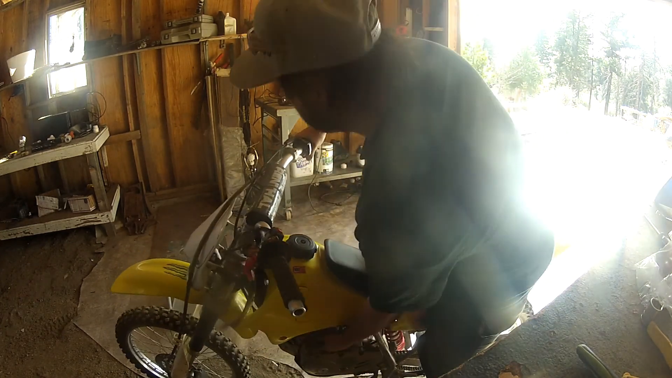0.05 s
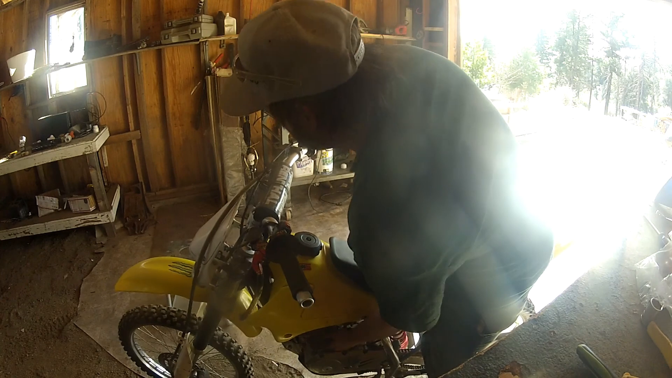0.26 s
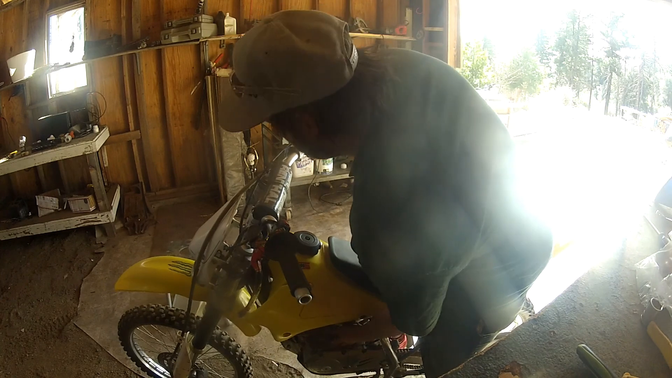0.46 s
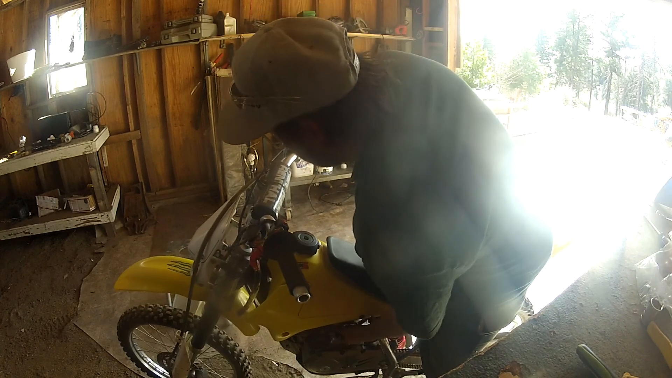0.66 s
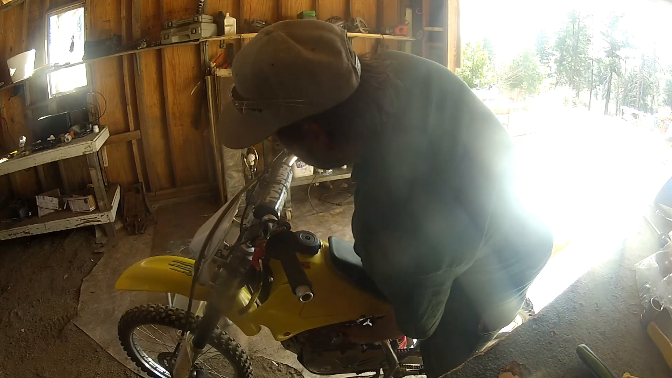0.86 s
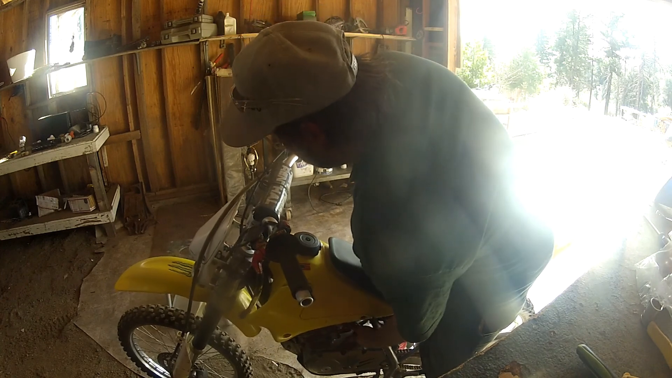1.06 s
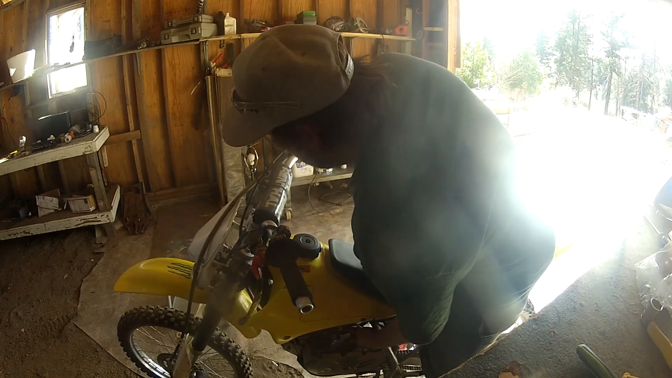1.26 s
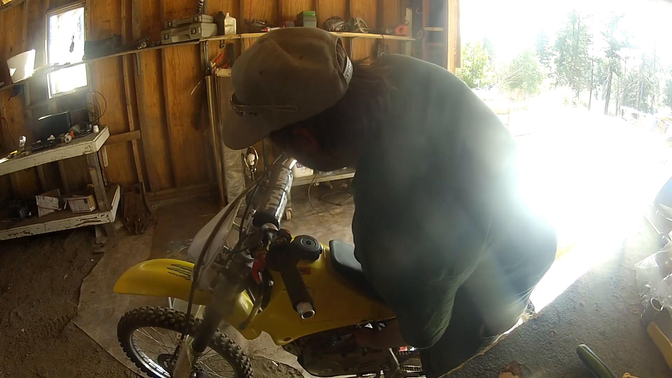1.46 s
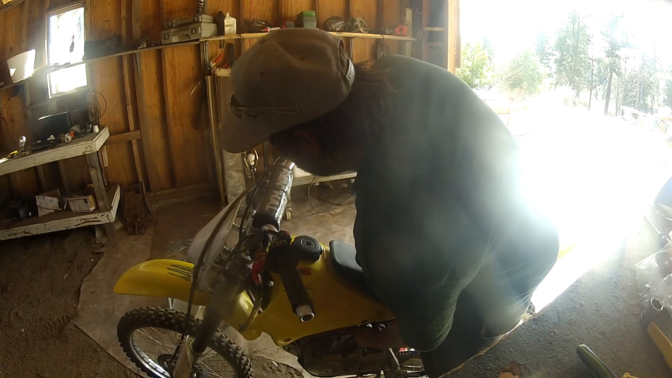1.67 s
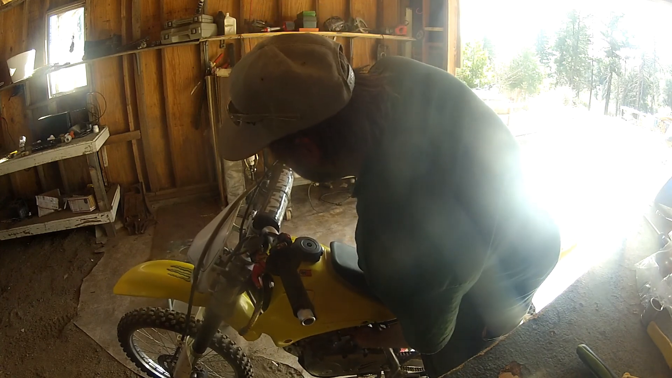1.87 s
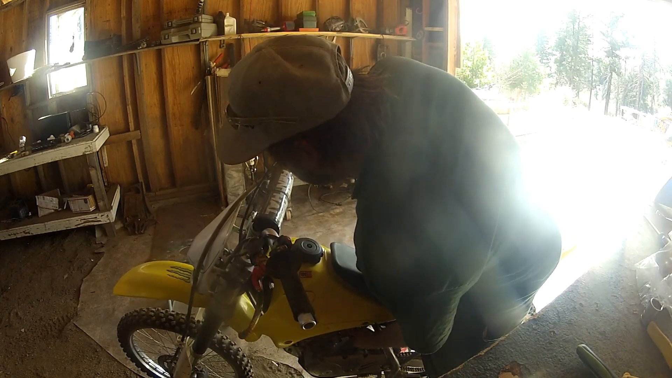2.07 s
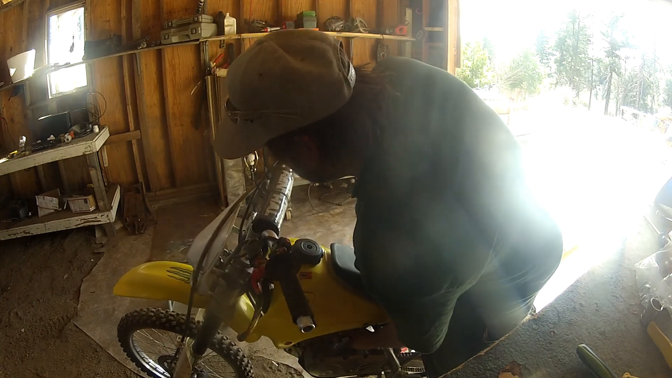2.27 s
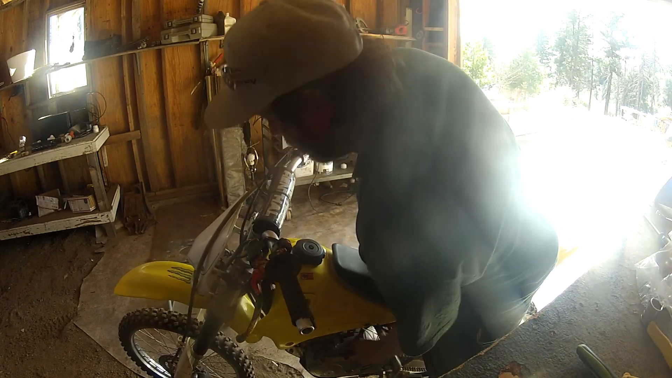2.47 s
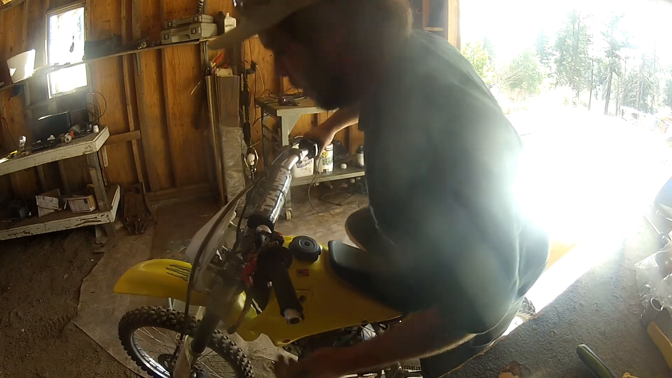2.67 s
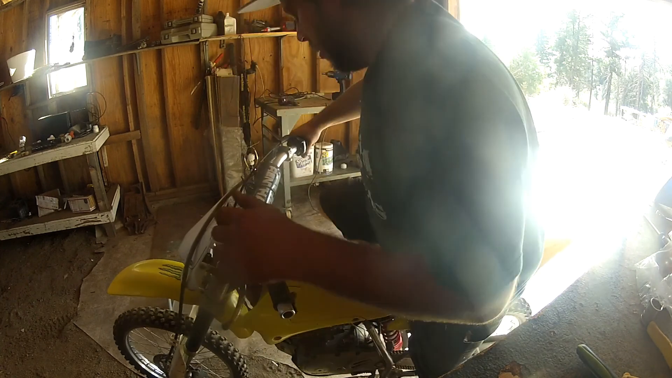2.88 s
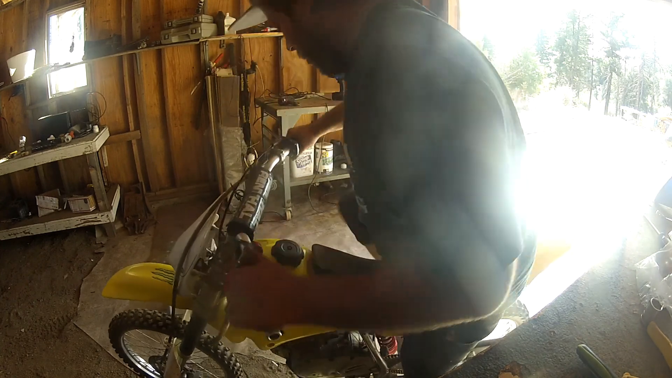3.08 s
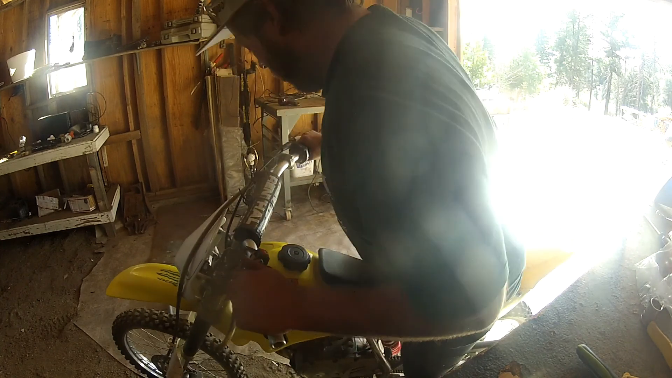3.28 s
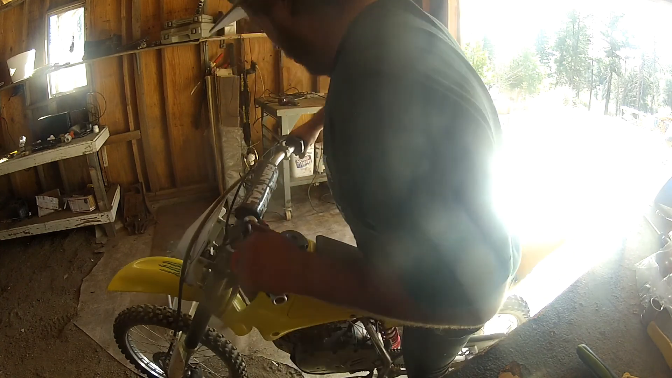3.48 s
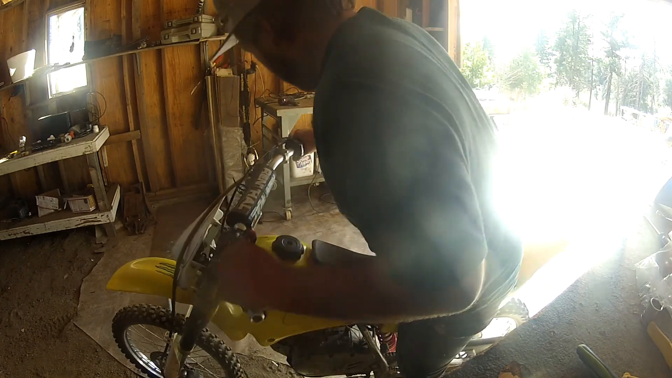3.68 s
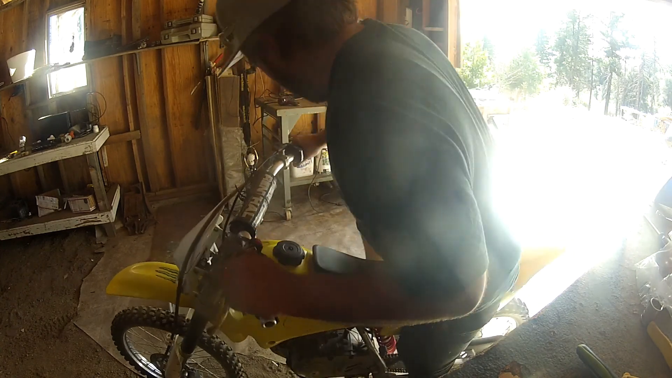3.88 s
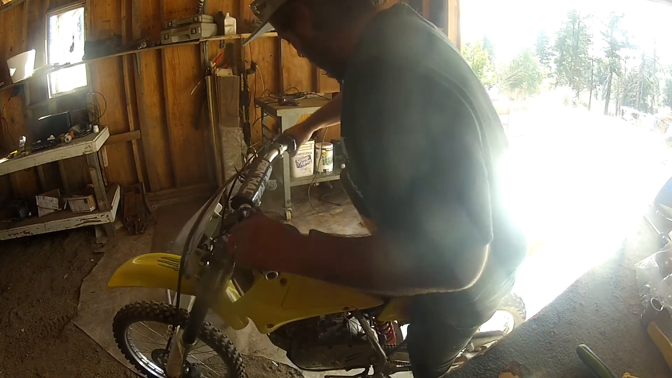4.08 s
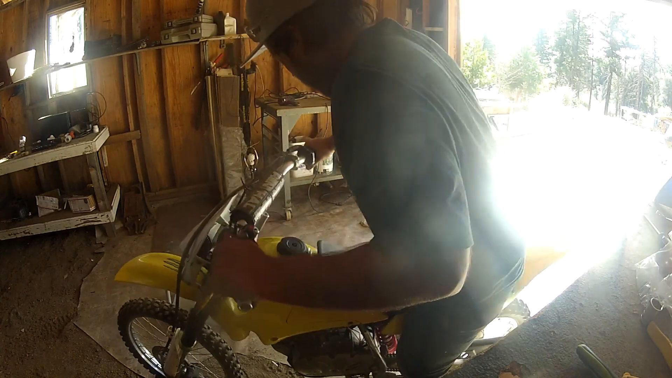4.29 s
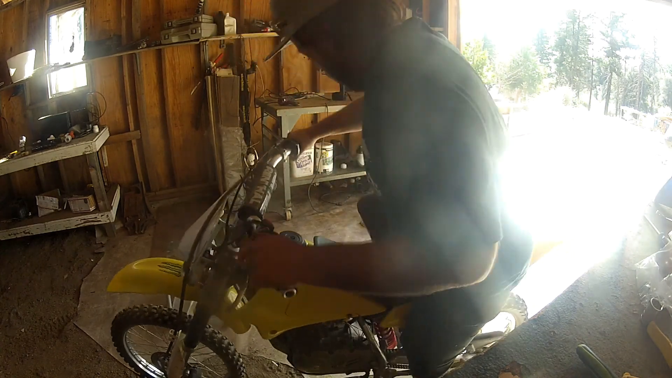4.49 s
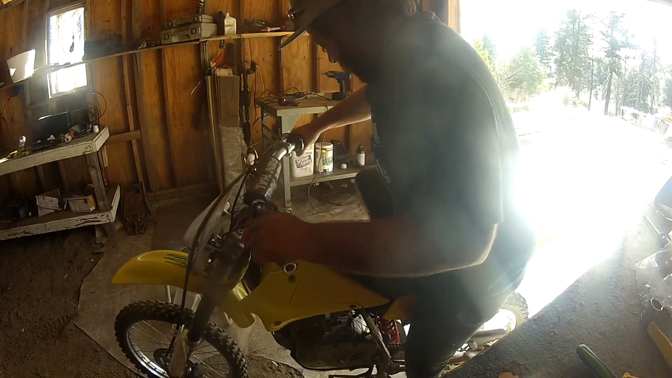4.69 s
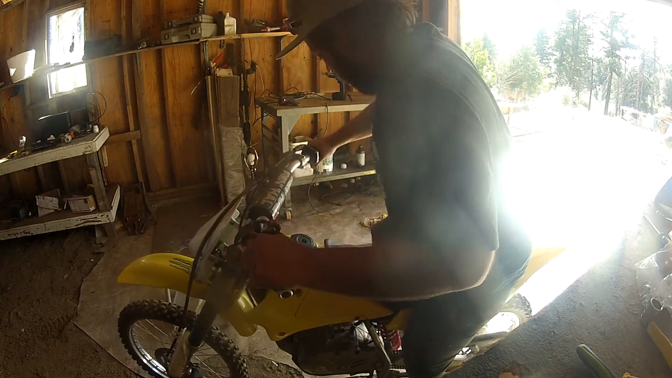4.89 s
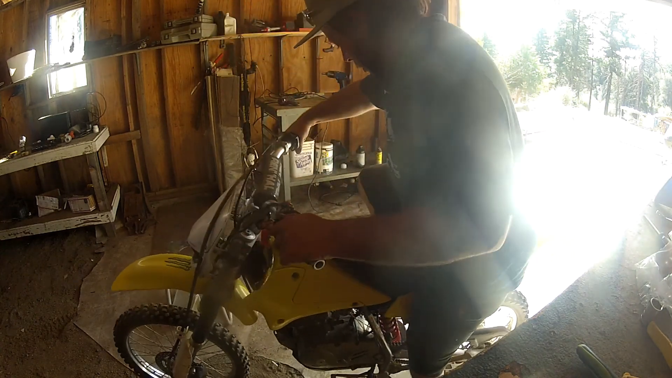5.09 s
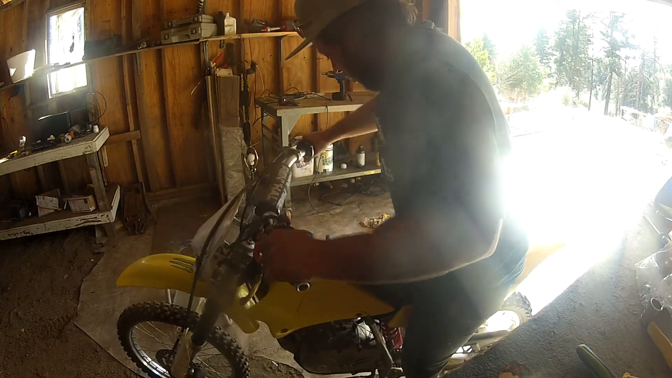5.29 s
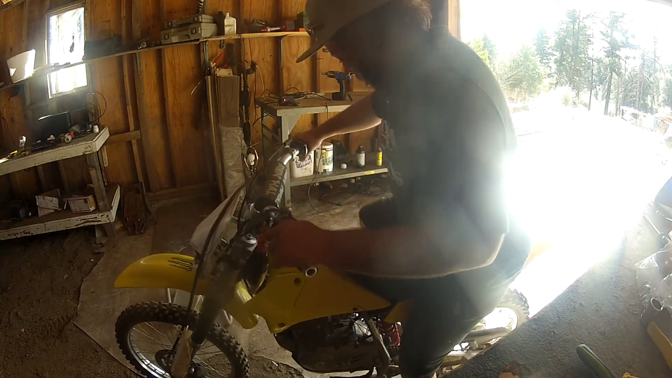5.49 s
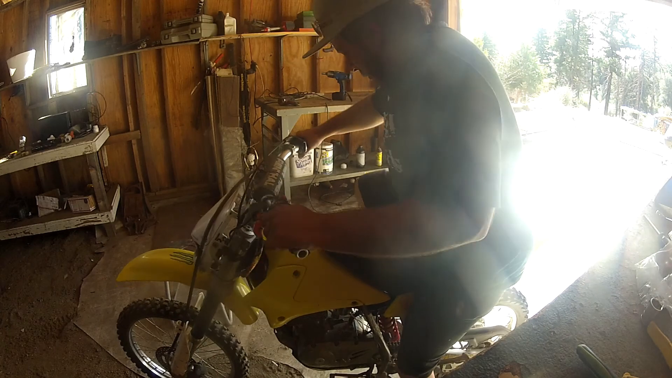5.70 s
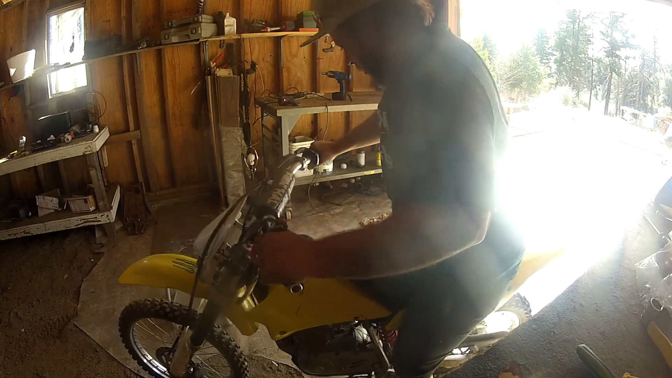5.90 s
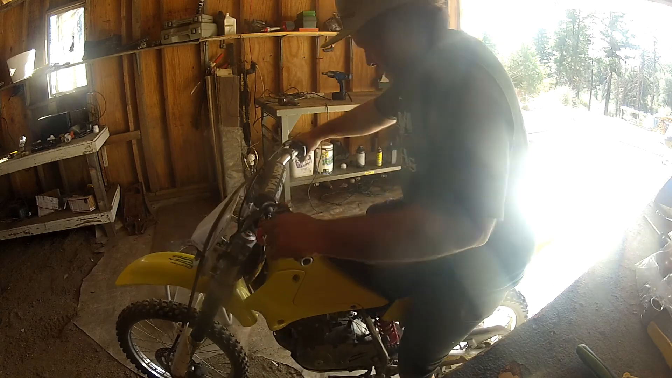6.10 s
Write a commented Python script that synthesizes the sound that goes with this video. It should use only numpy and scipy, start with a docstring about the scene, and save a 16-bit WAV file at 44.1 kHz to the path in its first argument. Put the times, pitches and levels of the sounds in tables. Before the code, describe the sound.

Nearly silent at first, only cloth movement, faint scrapes and steady air. Midway a small motorbike's lever creaks and clicks, then come six quick kickstart strokes, each a clack, a ringing metal clank, a brief churning rattle of the engine and low puffs from the pipe, with boot scuffs between. No firing. Near microphone with coarse treble, short garage reflections.

```python
"""A kick lever on a small single-cylinder motorbike is trodden six times in a wooden garage; it never fires.
Slams, lever and ratchet clicks ring metal modes; engine parts are random contacts in resonances.
The exhaust puffs as low sines; knocks, scuffs and squeaks are shaped noise; eight feedback delays echo.
Cloth rustle and outdoor air are coloured noise under it all.
Sample-and-hold at 12 kHz mirrors the sound into the treble."""
import sys
import numpy as np
from scipy import signal
from scipy.fft import rfft, irfft, next_fast_len
from scipy.io import wavfile

SR = 44100
rng = np.random.default_rng(int(sys.argv[2]) if len(sys.argv) > 2 else 0)


def persist_wave(psi):
    """Save psi, clipped to +-1, as 16-bit WAV."""
    counts = np.round(np.clip(psi, -1, 1) * 32767).astype(np.int16)
    wavfile.write(sys.argv[1], SR, np.atleast_2d(counts).T)


N = 271134

# lever slams on its stop: start_s
SLAM_START_S = [3.262, 3.83, 4.349, 4.903, 5.41, 5.921]
# six kicks: slam_db, slam_brightness_db, rebound_delay_s, rebound_db, jolt_share,
# spin_s, vigour_db, cover_buzz_db, lever_back_s (after the slam), swing_db
KICKS = [(-9, -22, 0.036, -23.5, 0.37, .205, -1.5, 0, .42, 1.5),
         (-8, -4.5, 0.018, -21.5, 1.34, 0.2, 0.74, -0.6, 0.32, -0.5),
         (-5.5, -9.5, 0.036, -23.5, 1.45, 0.21, 0.5, 1, 0.43, -3.2),
         (-16, -3, .032, -22, 1.24, 0.27, -1.2, -0.2, 0.17, 5),
         (-14.5, -2.5, .027, -21, 1.38, 0.2, -0.53, 0.8, 0.14, -6),
         (-12, -8, .037, -23, 1.1, 0.2, 0.4, 0.8, .4, 5.5)]
# boot lands on the lever and pushes: start_s, landing_db, landing_brightness_db, push_db
BOOT = [(3.139, -51, 2, -4.5), (3.712, -35, -13, 0), (4.245, -44, -12, 1.5), (4.807, -39, -10.5, 1),
        (5.325, -53, 1, 1), (5.754, -40, -17, -5)]
# lever and ratchet clicks: start_s, level_db, brightness_db
CLICKS = [(2.927, -28.5, 13), (3.241, -15, 0.5), (3.519, -19, -14), (3.784, -21, 7), (3.795, -17.5, 4),
          (4.308, -12.5, 5.5), (4.859, -12, -4), (5.878, -12, 7)]
# engine part levels through a kick: landing_db, push_rise_db_per_s, spin_db, jolt_db,
# spin_sag_db_per_s, stop_fall_db_per_s, swing_back_db, linger_s
RATTLE = (-54.5, 78, -32.5, 3, 11.5, 205, -60, 0.0036)
BUZZ = (-71, 90, -38, -2, -17.5, 215, -87, -0.0016)
RUMBLE = (-48, 117, -30.5, 4.5, 21, 134, -48, 0.03)
BOOM = (-47.5, 146, -36, 13, 17.5, 98, -48, 0.03)
# lever folded out and eased against compression: time_s, drag_db
SETTING_UP = [(2.45, -78), (2.57, -71), (2.71, -63), (2.775, -63), (2.79, -47), (2.85, -59.5), (2.88, -48),
              (3.04, -55), (3.12, -60), (3.2, -61)]
# drag shares: rattle_db, buzz_db, rumble_db, boom_db
DRAG_SHARES = (-3.5, -11, 1, -8)
# exhaust valve opens, twice a kick: start_s, level_db
VALVE = [(3.211, -24.5), (3.336, -26.5), (3.815, -25.5), (3.932, -27.5), (4.329, -25), (4.446, -23),
         (4.885, -24.5), (5.019, -24.5), (5.367, -23.5), (5.488, -26), (5.905, -26.5), (6.022, -27)]
# boot and lever knock and scuff on the engine: start_s, level_db, brightness_db
KNOCKS = [(1.632, -52, -8.5), (2.784, -45, -6), (2.803, -50, 4.5), (2.864, -46.5, 0.5), (2.883, -51, 6),
          (2.945, -45, 3), (3.02, -53, -0.5), (3.428, -33, -8), (3.53, -31, -23), (3.586, -39, -28),
          (3.629, -52, -24), (3.696, -44, -12), (3.868, -41, -8), (4.09, -37, -17), (4.257, -39, -22),
          (4.697, -37, -16), (5.046, -35, -2), (5.059, -32.5, -1), (5.19, -41, -19), (5.7, -63, -20),
          (5.819, -52, -3), (6.037, -31, -10)]
# narrow scrapes and squeaks: start_s, length_s, pitch_hz, width_hz (per pass), level_db
SQUEAKS = [(0.3, 0.045, 2340, 250, -72), (0.612, 0.085, 3910, 200, -67.5), (0.623, 0.045, 4900, 600, -70),
           (1.057, 0.12, 5000, 900, -77), (2.132, 0.026, 3000, 130, -57), (2.177, 0.027, 2900, 130, -63.5),
           (2.382, 0.015, 3450, 700, -67), (2.56, 0.1, 2830, 300, -74), (2.654, 0.11, 575, 200, -57.5),
           (2.776, 0.083, 566, 151, -45), (2.86, 0.18, 550, 150, -50), (3.023, 0.033, 3040, 500, -54.5),
           (4.704, 0.076, 2830, 500, -59.5), (5.312, 0.16, 4550, 150, -57.5)]
# clothes and boots move: start_s, length_s, dull_db, scratchy_db
RUSTLE = [(-.03, 0.088, -58, -78), (.47, 0.15, -69, -70.5), (0.61, 0.073, -67, -64.5),
          (0.822, 0.016, -66, -71), (0.93, 0.21, -87, -72.5), (1.64, 0.052, -69, -85),
          (2.133, 0.067, -54.5, -75), (2.51, 0.21, -67, -71)]
# rustle between movements: dull_db, scratchy_db
RUSTLE_REST = (-69.5, -79.5)
# modes of lever stop, lever and exhaust pipe: pitch_hz, level_db, t60_s
STOP_MODES = [(109.5, -6.5, 0.3), (246, -5, 0.18), (487, -3.5, 0.034), (690, -12, 0.012), (802, -2.5, 0.11),
              (940, -11.5, 0.041), (1110, -15, 0.047), (2406, 0.5, 0.11), (2470, -37, 0.049),
              (2600, -27, 0.078), (4920, -1, 0.17), (5080, -8.5, 0.12)]
LEVER_MODES = [(304, -18, 0.046), (612, 2, 0.076), (670, -36, 0.051), (937, -13, 0.074), (2850, -23, 0.04),
               (4633, -20.5, 0.038)]
PIPE_MODES = [(62.7, 7.5, 0.24), (116.3, -0.5, 0.49)]
# resonances of gears, side cover, crankcase and frame: pitch_hz, width_hz, level_db
GEARS = [(1330, 1540, -13), (2490, 314, -3.5), (2890, 210, 0.5), (3177, 840, -6), (4110, 450, -8),
         (4583, 195, -4.5), (5175, 670, -12.5)]
COVER = [(1943, 305, -9.5), (2140, 194, -6.5)]
CASE = [(426, 77, -5.5), (551, 46.6, 0.5), (615, 93, -1), (735.5, 116, -4.5), (877, 106, -12.5)]
FRAME = [(75, 38, -3), (128, 61, -6.5), (211.4, 30.6, -4.5), (258.8, 22, -1), (296, 43.7, -0.5)]
# spectra of dull rustle, scratchy rustle and outdoor air: frequency_hz, relative_db_per_hz
CLOTH = [(100, 1.5), (300, 2.5), (700, -0.5), (1200, -15.5), (2000, -25.5)]
SCRATCH = [(1000, -6), (2000, -1.5), (3000, 4.5), (4500, -2.5), (5900, -7)]
AIR = [(15, -40), (25, -3), (118, -4), (207, -7), (284, -5), (380, -14), (609, -18), (798, -21),
       (1070, -24), (1710, -24.5), (1960, -25.5), (5400, -30.5), (7020, -70), (11900, -120)]

LEAN_S, JOLT_DECAY_S, SETTLE_DECAY_S = 0.02, 0.052, 0.049
SCUFF_DECAY_S, BOOT_SCUFF_DECAY_S, CRASH_DECAY_S = 0.012, 0.019, 0.038
COVER_OFFSET_DB = 1
ECHO_PUFF_S, ECHO_PUFF_DB = 0.052, -38.5   # weak third puff after the second
GARAGE_T60_S, WALL_CUT_HZ, GARAGE_DB = 0.22, 8300, -11
RUSTLE_RISE_S, RUSTLE_DECAY_S = 0.016, 0.041
AIR_DB = -59.5
LOW_CUT_HZ, ALIAS_CUT_HZ, HOLD_HZ, TOP_CUT_HZ = 34.8, 5740, 12000, 15300


def lever_slams():
    """The lever hits its stop: a contact and short chatter ring the stop modes."""
    slam_db, bright_db = np.transpose(KICKS)[:2]
    events = np.transpose([SLAM_START_S, slam_db, bright_db])
    return blows(events, STOP_MODES, level_db=-11.5, scatter_db=1.0, chatter_s=0.0056)


def lever_and_ratchet_clicks():
    """Lever and ratchet clicks ring the lever modes."""
    return blows(CLICKS, LEVER_MODES, level_db=-7.5, scatter_db=1.0, chatter_s=0.0075)


def blows(events, modes, level_db, scatter_db, chatter_s):
    """Each contact with chatter strikes every mode anew; brightness lifts modes above 1.5 kHz."""
    start_s, db, bright_db = np.transpose(events)
    at, out = np.round(start_s * SR).astype(int), np.zeros(N)
    luck = rng.standard_normal((len(at), len(modes)))
    fade = np.exp(-np.arange(2000) / (chatter_s * SR))
    fade = rms_one(fade) / 45   # about unit energy
    for k, (hz, mode_db, t60_s) in enumerate(modes):
        strike_db = db + level_db + mode_db + scatter_db * luck[:, k]
        clicks = np.zeros(N)
        clicks[at] = from_db(strike_db + bright_db * (hz > 1500))
        chatter = signal.fftconvolve(clicks, fade)[:N] * rng.standard_normal(N)
        out += ring(0.24 * clicks + chatter, hz, t60_s)
    return out


def engine():
    """Loose gear teeth rattle and buzz the side cover; heavier contacts shake crankcase and frame."""
    drag_db, = in_time(SETTING_UP)
    rattle = rms_one(resonances(clatter(3500, spread_db=1.0), GEARS))
    buzz = rms_one(resonances(clatter(900, spread_db=1.5), COVER))
    rumble = rms_one(resonances(clatter(500, spread_db=1.0), CASE))
    boom = rms_one(resonances(clatter(300, spread_db=1.0), FRAME))
    out = np.zeros(N)
    parts = zip((rattle, buzz, rumble, boom), (RATTLE, BUZZ, RUMBLE, BOOM), DRAG_SHARES)
    for part, rule, share_db in parts:
        gain = follow(rule, cover=rule is BUZZ) + from_db(drag_db + share_db)
        out += gain * part
    return out


def follow(rule, cover=False):
    """Gain of one engine part over all kicks: push, jolt and free spin, run-down, lever swinging back."""
    land_db, rise, spin_db, jolt_db, sag, fall, back_db, linger_s = rule
    t, power = np.arange(N) / SR, 0
    for boot, slam_s, kick in zip(BOOT, SLAM_START_S, KICKS):
        land_s, *_, push_db = boot
        *_, jolt, spin_s, vigour_db, cover_db, back_s, swing_db = kick
        after = t - slam_s
        lean = np.clip((t - land_s) / LEAN_S, 0, 1) * (after < 0)
        push = lean * from_db(land_db + push_db + rise * np.minimum(t - land_s, 1))
        held = np.clip(after, 0, spin_s + linger_s)
        level_db = spin_db + (cover_db if cover else vigour_db)
        level_db = level_db + jolt * jolt_db * np.exp(-held / JOLT_DECAY_S)
        level_db = level_db - sag * held - fall * np.maximum(after - held, 0)
        spin = (after >= 0) * from_db(level_db)
        settle = np.exp(-np.maximum(after - back_s, 0) / SETTLE_DECAY_S)
        back = (after >= 0) * settle * from_db(back_db + swing_db)
        power = power + push ** 2 + spin ** 2 + back ** 2
    return np.sqrt(power)


def exhaust():
    """Pipe modes build while the valve is open, drop when it shuts and hum on faintly."""
    t, out = np.arange(SR // 2) / SR, np.zeros(N + SR)
    open_s, shut_decay_s, hum = 0.031, 0.008, from_db(-11)
    after = np.maximum(t - open_s, 0)
    build = np.interp(t, [0, 0.003, open_s], [0, 0.4, 1])
    puff = 0
    for k, (hz, db, t60_s) in enumerate(PIPE_MODES):
        drop = (1 - hum) * np.exp(-after / shut_decay_s)
        fade = drop + hum * from_db(-60 * after / t60_s)
        puff = puff - (-1) ** k * from_db(db) * build * fade * np.sin(2 * np.pi * hz * t)
    echoes = [(s + ECHO_PUFF_S, ECHO_PUFF_DB) for s, _ in VALVE[1::2]]
    for s, db in list(VALVE) + echoes:
        i = round(s * SR)
        out[i:i + len(t)] += from_db(db) * puff
    return out[:N]


def slam_crashes():
    """Each slam also shakes the engine bodies with decaying friction."""
    slam_db, bright_db = np.transpose(KICKS)[:2]
    slams = zip(SLAM_START_S, slam_db, bright_db)
    return knocks([(s, db - 23, b + 8, -11, CRASH_DECAY_S) for s, db, b in slams])


def boot_and_lever_knocks():
    """Boot landings, lever rebounds and stray contacts scuff the engine bodies."""
    delay_s, rebound_db = np.transpose(KICKS)[2:4]
    boots = [(s, db, b, b - 11, BOOT_SCUFF_DECAY_S) for s, db, b, _ in BOOT]
    rebound_s = np.array(SLAM_START_S) + delay_s
    rebounds = [(s, db, -8, -13, SCUFF_DECAY_S) for s, db in zip(rebound_s, rebound_db)]
    others = [(s, db, b, b + COVER_OFFSET_DB, SCUFF_DECAY_S) for s, db, b in KNOCKS]
    return knocks(boots + rebounds + others)


def knocks(events):
    """Decaying friction bursts shake crankcase and frame, gears and cover."""
    t, shake = np.arange(N) / SR, np.zeros((3, N))
    for s, db, gears_db, cover_db, decay_s in events:
        fade = (t >= s) * np.exp(-np.maximum(t - s, 0) / decay_s)
        shake += from_db(db + np.array([[0], [gears_db], [cover_db]])) * fade
    white = rng.standard_normal((3, N))
    white[0, [int(s * SR) + 2 for s, *_ in events]] += 18   # first contact thumps the case
    peaks = (CASE + FRAME[2:], GEARS, COVER)
    bodies = [rms_one(resonances(noise, body)) for noise, body in zip(white, peaks)]
    return np.sum(shake * bodies, axis=0)


def squeaks():
    """Rubbing: noise twice through a narrow resonance, quick start, slower end."""
    t, out = np.arange(N) / SR, 0
    for s, length_s, hz, width_hz, db in SQUEAKS:
        band = [(hz, width_hz, 0)]
        end_s = s + length_s
        shape = np.interp(t, [s, s + 0.006, end_s, end_s + 0.035], [0, 1, 0.8, 0])
        tone = resonances(resonances(rng.standard_normal(N), band), band)
        out = out + from_db(db) * shape * rms_one(tone)
    return out


def garage(x):
    """Wall echoes: eight feedback delays, duller every round, stepped block by block."""
    out, dull = np.zeros(N), np.exp(-2 * np.pi * WALL_CUT_HZ / SR)
    lags = (rng.uniform(0.015, 0.04, 8) * SR).astype(int)
    for k, lag in enumerate(lags):
        loop, state = x.copy(), [0.]
        gain = from_db(-60 * lag / SR / GARAGE_T60_S)
        for i in range(lag, N, lag):
            back, state = signal.lfilter([gain * (1 - dull)], [1, -dull], loop[i - lag:i], zi=state)
            loop[i:i + lag] += back[:N - i]
        out += (loop - x) * (-1) ** k
    return out


def rustle():
    """Cloth and boots: two coloured noises, faint throughout, swelling with each movement."""
    t, gains = np.arange(N) / SR, np.outer(from_db(RUSTLE_REST), np.ones(N))
    for s, length_s, *level_db in RUSTLE:
        rise = np.clip((t - s) / RUSTLE_RISE_S, 0, 1)
        fade = np.exp(-np.maximum(t - s - length_s, 0) / RUSTLE_DECAY_S)
        gains = gains + np.outer(from_db(level_db), rise * fade)
    return gains[0] * coloured(CLOTH) + gains[1] * coloured(SCRATCH)


def outdoor_air():
    """Steady noise, weighted to the lows."""
    return from_db(AIR_DB) * coloured(AIR)


def from_db(db):
    """Gain of a level in dB."""
    return 10 ** (np.asarray(db) / 20)


def rms_one(x):
    """Scaled to rms 1."""
    return x / np.sqrt(np.mean(x ** 2) + 1e-20)


def in_time(rows):
    """Curve columns at every sample; -120 outside the table."""
    s, *columns = np.transpose(rows)
    return [np.interp(np.arange(N) / SR, s, c, left=-120, right=-120) for c in columns]


def coloured(points):
    """Noise of rms 1 with a spectrum interpolated over log frequency."""
    hz, db = np.transpose(points)
    f = np.maximum(np.arange(N // 2 + 1) * SR / N, 1)
    gain = from_db(np.interp(np.log(f), np.log(hz), db))
    return rms_one(irfft(rfft(rng.standard_normal(N)) * gain, N))


def ring(clicks, hz, t60_s):
    """Two-pole mode: a unit click starts a decaying sine of height 1."""
    r, w = from_db(-60 / (t60_s * SR)), 2 * np.pi * hz / SR
    return signal.lfilter([0, np.sin(w)], [1, -2 * r * np.cos(w), r * r], clicks + 1e-18)


def resonances(x, peaks):
    """Parallel two-pole resonances with alternating signs."""
    out = 0
    for k, (hz, width_hz, db) in enumerate(peaks):
        r = np.exp(-np.pi * width_hz / SR)
        a = [1, -2 * r * np.cos(2 * np.pi * hz / SR), r * r]
        b = [(1 - r * r) / 2, 0, (r * r - 1) / 2]
        out = out + (-1) ** k * from_db(db) * signal.lfilter(b, a, x)
    return out


def clatter(per_s, spread_db):
    """Random contacts of uneven, exponentially spread strength in dB and random sign."""
    sizes = from_db(spread_db * np.minimum(rng.exponential(1, N), 4))
    signs = rng.choice([-1, 1], N)
    return sizes * signs * (rng.random(N) < per_s / SR) + 1e-18


def scene():
    """Bike in the garage over rustle and outdoor air; only the metal echoes."""
    metal = lever_slams() + slam_crashes() + lever_and_ratchet_clicks() + boot_and_lever_knocks()
    metal = metal + engine() + squeaks()
    echoes = from_db(GARAGE_DB) * garage(metal)
    return (metal + echoes + exhaust() + rustle() + outdoor_air())[None]


def record(dry):
    """Band-limited, sampled at 12 kHz and held, then cut at the top."""
    band = signal.sosfilt(signal.butter(2, LOW_CUT_HZ, "high", fs=SR, output="sos"), dry)
    band = signal.sosfilt(signal.butter(9, ALIAS_CUT_HZ, fs=SR, output="sos"), band)
    # sampling mirrors the band around HOLD_HZ; holding weights it by sin(x)/x
    sampled = band * (1 + 2 * np.cos(2 * np.pi * HOLD_HZ * np.arange(N) / SR))
    size = next_fast_len(N + 100)
    weight = np.sinc(np.arange(size // 2 + 1) * SR / size / HOLD_HZ)
    held = irfft(rfft(sampled, size) * weight, size)[:, :N]
    return signal.sosfilt(signal.ellip(10, 0.5, 65, TOP_CUT_HZ, fs=SR, output="sos"), held)


dry = scene()
out = record(dry)
persist_wave(out)
```